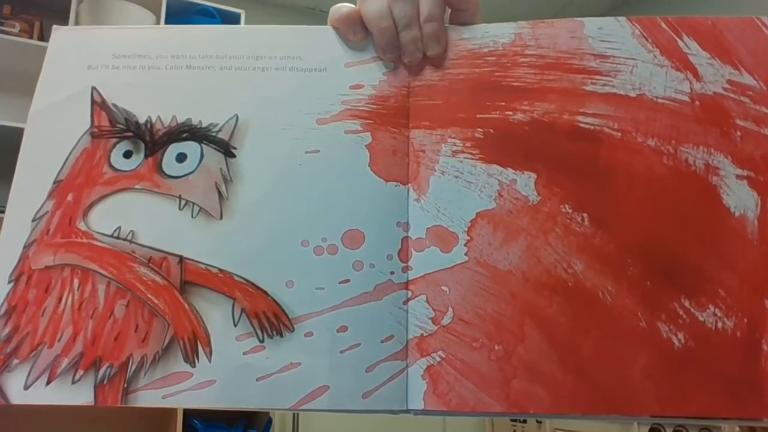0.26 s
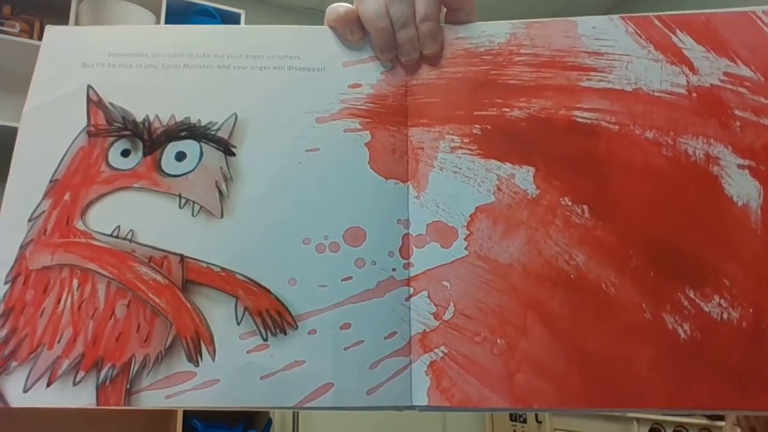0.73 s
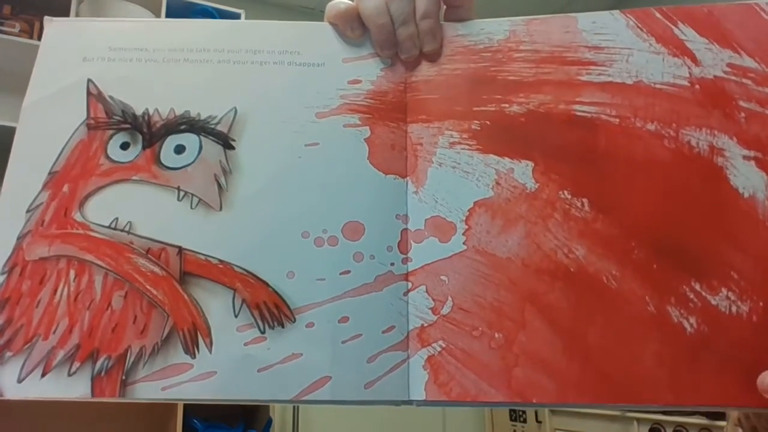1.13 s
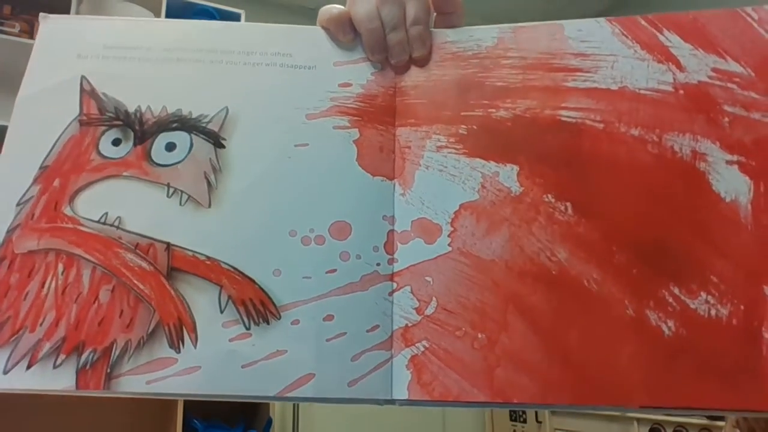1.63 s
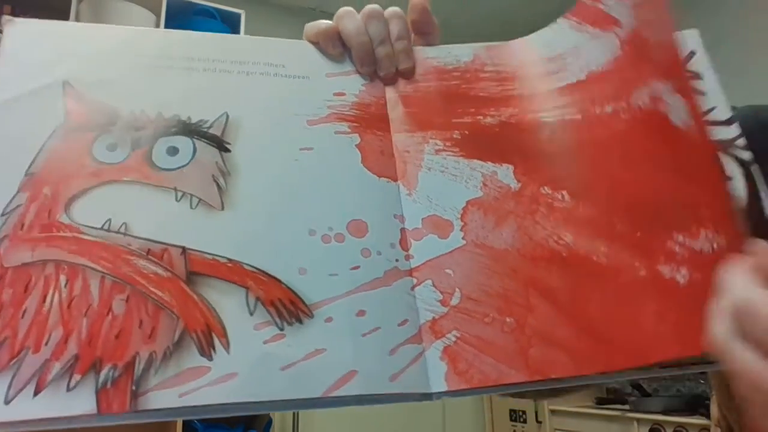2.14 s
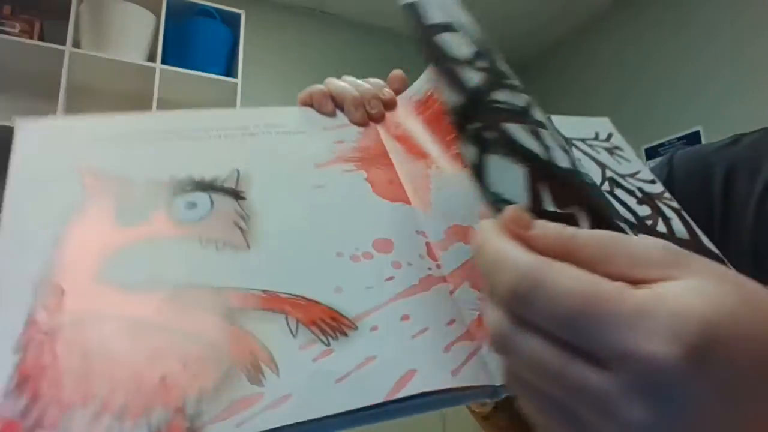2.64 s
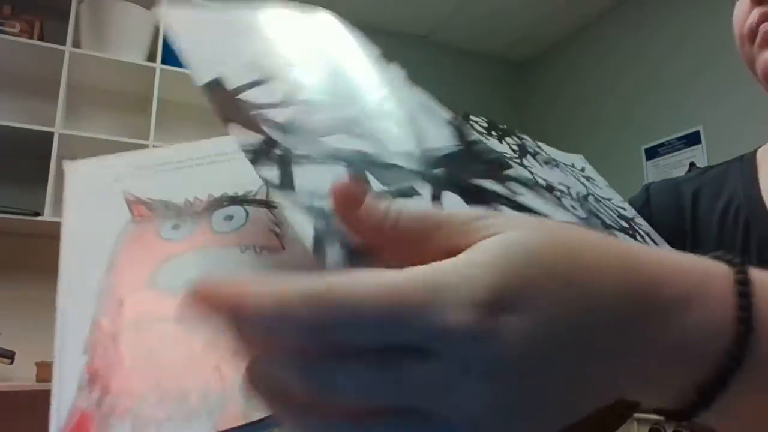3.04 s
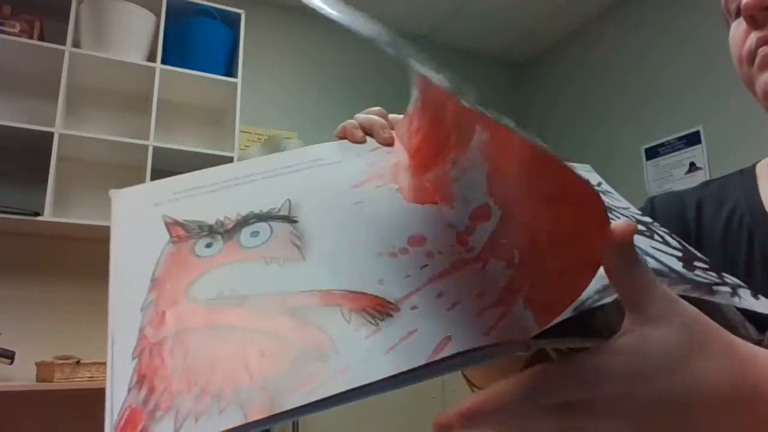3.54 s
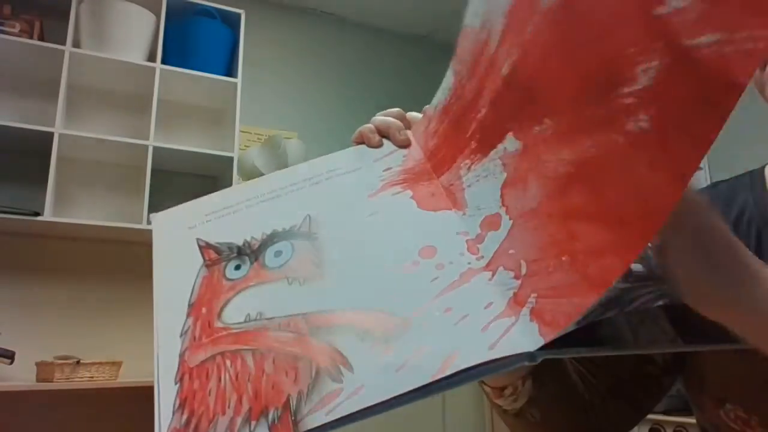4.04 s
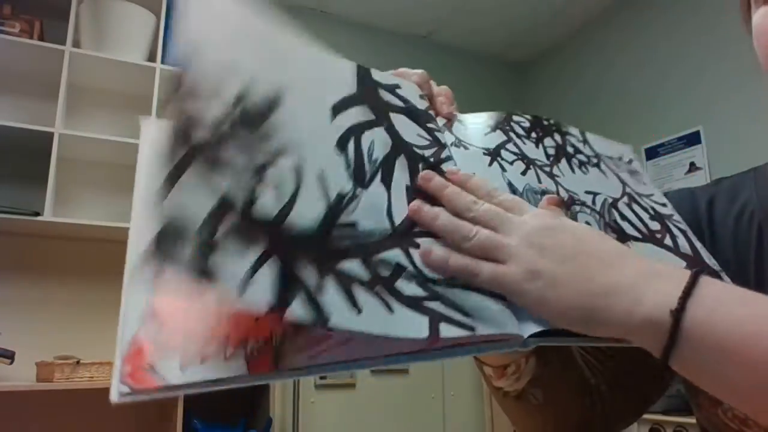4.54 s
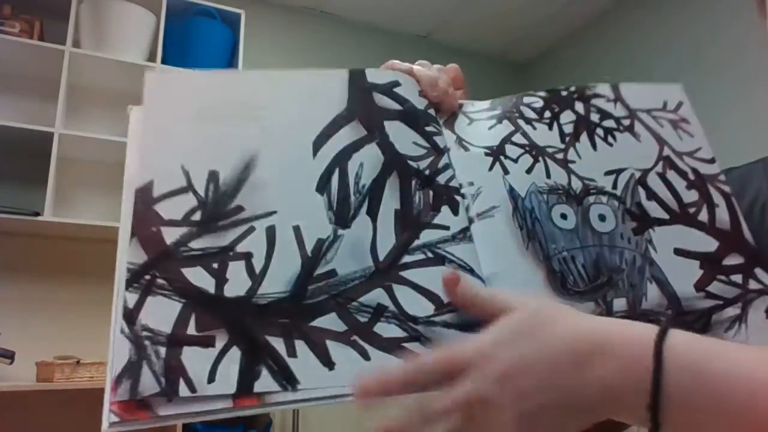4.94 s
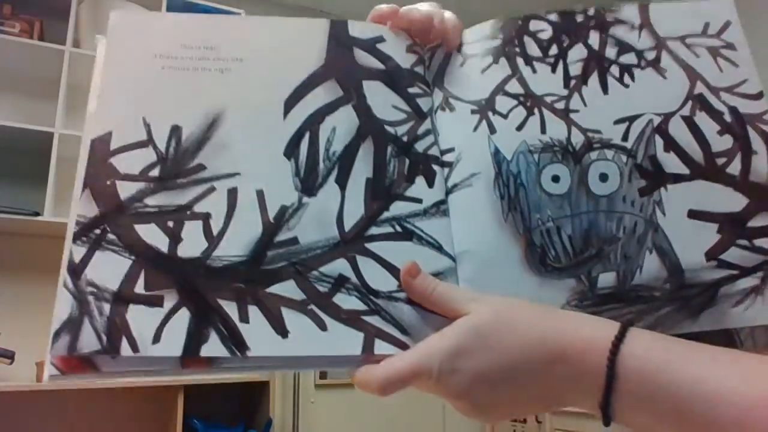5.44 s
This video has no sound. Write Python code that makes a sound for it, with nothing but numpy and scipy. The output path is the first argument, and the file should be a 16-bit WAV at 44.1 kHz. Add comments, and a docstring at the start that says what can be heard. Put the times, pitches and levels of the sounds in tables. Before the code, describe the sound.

In a quiet room, a stiff glossy book page is lifted and turned with crisp crackles, finger scrapes and small hollow flaps.

```python
"""In a quiet room, a hand lifts and turns the stiff glossy page of a large book near a small microphone.
Buckling snaps and short finger slips are brief noise bursts in three ranges of the sheet; hollow flaps boom.
Sliding hisses, bending murmurs and skin rubs as flickering coloured noise, and the room answers the paper.
Beneath lie ventilation rumble, microphone hiss (both coloured noise) and the faint sine whine of electronics."""
import sys
import numpy as np
from scipy import signal
from scipy.fft import rfft, irfft
from scipy.io import wavfile
from scipy.ndimage import uniform_filter1d, map_coordinates

SR = 44100
rng = np.random.default_rng(int(sys.argv[2]) if len(sys.argv) > 2 else 0)


def unload_audio(sound):
    """Save the sound as a 16-bit wav file, at the path given as the first command line argument."""
    columns = np.transpose(np.atleast_2d(sound))
    # keep every value between -1 and 1, then stretch to whole-number steps
    steps = np.round(np.clip(columns, -1, 1) * 32767)
    wavfile.write(sys.argv[1], SR, steps.astype(np.int16))


def amplitude_ratio(level_db):
    """Convert a level in decibels to the matching linear amplitude (field) ratio."""
    exponent = np.asarray(level_db, float) / 20
    return 10 ** exponent


N = 251105  # samples

# Colour of the ventilation rumble: f/Hz, relative level/dB
RUMBLE_COLOUR = [(15, -55), (40, -31.5), (55, -18.5), (72, -2), (90, -5), (115, 2.5), (160, -2), (210, -8),
                 (270, -20), (400, -25), (750, -42.5), (1200, -37)]
# Colour of the microphone hiss: f/Hz, relative level/dB
HISS_COLOUR = [(700, -11.5), (1300, -24.5), (1950, -24), (2600, -23), (2900, -11), (3250, -26.5),
               (4900, -18.5), (7000, -16), (9000, -12.5), (10800, -12.5), (13500, -13.5), (15700, -18)]
# Steady tones of the electronics: f/Hz, rms level/dB
WHINE_TONES = [(2904.5, -93), (5809, -98), (8000, -79), (8683.5, -90), (10191, -93), (10221, -94),
               (10784.5, -91), (10844.5, -92), (10874.5, -92), (10904.5, -79), (11588, -84), (13095.5, -90)]
# Decay of the room: f/Hz, time to fall by 60 dB/s
ROOM_DECAY = [(300, 0.31), (2000, 0.13), (10000, 0.093)]

# Colour of sheet sliding on sheet: f/Hz, relative level/dB
SLIDE_COLOUR = [(1200, -29.5), (2100, -16.5), (2900, -4.5), (3400, -4), (4400, 0), (5300, 0.5), (6500, -5),
                (9000, -14.5), (14000, -27)]
# Colour of the thin top of the slide: f/Hz, relative level/dB
THIN_COLOUR = [(4000, -38.5), (6500, -6), (8500, -2.5), (10500, 0), (13000, 0), (15700, -5)]
# Colour of the bending murmur: f/Hz, relative level/dB
BEND_COLOUR = [(150, -30), (280, -6), (420, -3), (540, -3.5), (680, -7), (850, -15), (1400, -27.5)]
# Colour of skin rubbing paper: f/Hz, relative level/dB
RUB_COLOUR = [(600, -28.5), (950, 0.5), (1200, -3), (1550, -0.5), (2000, -11), (2800, -17)]
# Long slide of the page: t/s, hiss level/dB, thin top over the hiss/dB
SLIDING = [(1.5, -85, 8), (1.68, -72, 8), (1.79, -69, 7), (1.92, -57, -2), (2.18, -69, 3.5),
           (2.27, -61, -3), (2.42, -75, 6), (2.7, -71, 3), (2.83, -67, -1), (3.26, -66.5, 1), (3.4, -71, 7),
           (3.77, -81, 4.5), (4.118, -80.5, 7), (4.132, -63, -4), (4.2, -58.5, 2), (4.41, -60, 6.5),
           (4.5, -64, 5), (4.66, -52, -0.5), (4.77, -51, 7), (4.84, -47.5, 6), (4.98, -53, 8.5),
           (5.06, -63, 4), (5.42, -62, -2.5), (5.69, -59, -4.5)]
# Short separate strokes of sheet on sheet: start t/s, length/s, hiss level/dB, thin top over the hiss/dB
STROKES = [(.698, 0.062, -75.5, 8.5), (0.948, 0.077, -81.5, 11.5), (1.585, 0.032, -72, 1),
           (1.792, 0.097, -55.5, 2), (2.68, 0.033, -70, -3), (2.84, 0.079, -55, -18),
           (2.868, 0.027, -45.5, -17), (3.681, 0.046, -73, -7), (5.47, 0.04, -66.5, -2)]
# Slow bend of the sheet: t/s, murmur level/dB
BENDING = [(1.55, -90.5), (1.75, -74), (1.92, -67.5), (2.1, -67), (2.32, -73.5), (2.5, -80.5), (2.86, -70),
           (3.04, -72.5), (3.2, -85), (4.1, -85.5), (4.22, -65), (4.55, -74), (4.68, -62), (4.75, -71.5),
           (5.11, -76), (5.35, -62.5), (5.45, -63), (5.5, -56.5), (5.6, -62), (5.69, -60)]
# The sheet gives way and settles: t/s, murmur level/dB, settling/(dB per s)
YIELDS = [(.7, -83, 150), (1.595, -73.5, 190), (2.69, -74, 150), (3.31, -67.5, 85), (3.71, -65.5, 85),
          (4.15, -47, 193), (5.19, -72, 110)]

# Hollow flaps of the bending sheet: loudest t/s, boom f/Hz, boom level/dB, upper ring level/dB, boom fall/ms
FLAPS = [(1.592, 490, -59, -52, 6.6), (1.82, 636, -57.5, -66, 8.4), (1.911, 530, -45, -46, 3.8),
         (2.009, 393, -57.5, -56, 8.5), (2.095, 587, -61, -65, 21), (2.293, 495, -57, -69, 3.3),
         (2.418, 496, -63, -68, 5.1), (2.668, 628, -49, -62, 5.9), (2.803, 507, -53, -71, 3.1),
         (2.839, 677, -52, -55.5, 14), (2.915, 760, -50, -55, 16), (3.298, 440, -62.5, -62, 10),
         (3.711, 553, -52, -57, 18), (3.763, 460, -56, -67, 18), (3.791, 600, -59, -72, 22),
         (4.125, 527, -50.5, -56, 9.4), (4.149, 484, -46.5, -65, 20.6), (4.172, 507, -43, -47, 20),
         (4.18, 167, -54.5, -70, 74), (4.551, 550, -61, -54, 7.8), (4.804, 470, -52.5, -81, 4.7),
         (5.374, 506, -40.5, -37, 3.9), (5.459, 586, -55, -55, 8), (5.548, 490, -44.5, -42, 2.6),
         (5.57, 194, -67, -66, 58)]
# Colour of the upper ring of a flap: f/Hz, relative level/dB
RING_COLOUR = [(600, -28), (820, -13), (980, 2.5), (1150, 5), (1350, -19), (1800, -21), (2500, -54)]
# Finger slips: loudest t/s, middle level/dB, bright level/dB, middle rise/ms, middle fall/ms
SLIPS = [(1.82, -34.5, -36, 3.9, 10.2), (1.86, -45, -47, 34, 15), (2.007, -41, -42, 7.2, 6.5),
         (2.68, -58.5, -62, 4.5, 27), (2.918, -37, -64, 6.2, 9), (3.305, -59.5, -60, 12, 9.8),
         (3.691, -57, -60, 23.5, 10.4), (3.815, -63.5, -64.5, 28, 9.4), (4.265, -54, -51, 32, 17),
         (4.646, -41.5, -43, 3.5, 5.4), (4.684, -23, -32.5, 6.2, 2.3), (4.9, -44.5, -47, 10.5, 26),
         (4.989, -47, -44, 4.4, 3.2), (5.11, -44, -44.5, 10, 4), (5.463, -52, -59, 4.2, 4.3),
         (5.534, -45.5, -44.5, 5, 12)]
# Short rubs of a fingertip: loudest t/s, level/dB, rise and fall each/ms
FINGER_RUBS = [(.722, -73, 20), (.957, -69.5, 9.1), (1.87, -53.5, 33), (3.051, -62, 24), (3.7, -66, 22),
               (4.19, -50, 14), (5.199, -62.5, 21), (5.27, -62.5, 23), (5.404, -56, 8), (5.462, -51.5, 5.2),
               (5.49, -59, 11), (5.56, -63, 15), (5.637, -60.5, 30), (5.67, -55, 17)]
# Buckling snaps: loudest t/s, middle level/dB, dull level/dB, bright level/dB, middle fall/ms
SNAPS = [(0.6956, -50, -55, -42, 0.6), (0.7199, -59, -67, -54, 0.72), (0.7459, -68, -58.5, -71, 2.5),
         (1.3108, -61.5, -71, -45.5, 2), (1.5886, -41, -49, -39.5, 3.6), (1.7378, -57, -56.5, -56, 0.52),
         (1.79, -53, -53.5, -54, 3.1), (1.9103, -29, -28, -37, 0.31), (1.9305, -45, -45.5, -43, 3.5),
         (1.9351, -46, -41, -50, 1.7), (2.2075, -54, -80, -53, 1.5), (2.2399, -49, -60, -42.5, 1.1),
         (2.2915, -35, -48.5, -33.5, 1.96), (2.2938, -39, -56, -34.5, 1.7), (2.4144, -62, -55.5, -59, 1.5),
         (2.5124, -57, -77, -49, 1.2), (2.5185, -48, -70, -43, 0.67), (2.5281, -47.5, -66, -34, 0.23),
         (2.5949, -59, -81, -45.5, .6), (2.6674, -29, -40.5, -31, 1.3), (2.7903, -58, -73, -45.5, 1.3),
         (2.801, -41.5, -53.5, -59, 2.2), (2.841, -47.5, -65, -64, 3.6), (2.9752, -46, -56, -66, 1.8),
         (2.9845, -52, -62, -63, 1.4), (3.0681, -52, -62, -75, .9), (3.1073, -55, -64, -44, 2.4),
         (3.197, -49, -74, -45.5, 1.4), (3.2111, -56, -64, -46, .7), (3.265, -42.5, -58, -33.5, 1.4),
         (3.2925, -40.5, -52.5, -41, 2.4), (3.3799, -56, -77, -53, .9), (3.4304, -54.5, -67, -47, 0.5),
         (3.518, -63.5, -77, -68, 4.5), (3.6649, -64, -70, -58, 1.9), (4.1243, -41.5, -54, -41.5, 2.5),
         (4.167, -44, -40.5, -37, 0.22), (4.2808, -42, -63, -40.5, 1.2), (4.3052, -43, -71, -52, .6),
         (4.3806, -37.5, -48, -33.5, 1.9), (4.3962, -49, -73, -32, 3.2), (4.4165, -36, -46, -27, 1.65),
         (4.4282, -36.5, -50, -36, .65), (4.4478, -48, -61, -47, 2.4), (4.5717, -63, -50, -63, .3),
         (4.6346, -43, -44, -49, 3.7), (4.6565, -39, -48, -44, 3.6), (4.672, -41, -30.5, -24.5, 0.71),
         (4.8031, -30, -35, -19.5, 1.6), (4.899, -40, -56, -44, .7), (5.0477, -53, -58, -35.5, .4),
         (5.2136, -54, -65, -50, .35), (5.2576, -40, -45, -51, 0.36), (5.3053, -39, -49, -44, 1.6),
         (5.3268, -42, -49, -60, 0.38), (5.3724, -32, -38.5, -34, 1.06), (5.55, -35, -52, -38, 0.62)]
# Middle range of a crease: f/Hz, relative level/dB
CRACK_COLOUR = [(1200, -47), (2050, -14.5), (2500, -7), (2900, 0.5), (3350, -6), (4200, 2), (5200, -0.5),
                (6500, -5), (9000, -12), (14000, -25)]
# Dull range of a crease: f/Hz, relative level/dB
KNOCK_COLOUR = [(600, -24.5), (950, -8.5), (1200, -6), (1520, 0.5), (1900, -8), (2300, -6.5), (3000, -24.5)]
# Bright range of a crease: f/Hz, relative level/dB
TICK_COLOUR = [(4000, -36.5), (6500, -4), (8500, -1.5), (11000, -1), (13500, -1), (15700, -2.5)]


def unit(x):
    """Scaled to rms 1."""
    return x / np.sqrt(np.mean(x ** 2) + 1e-20)


def along(points, hz):
    """Reads (Hz, value) points at hz, on a log frequency axis."""
    f, value = np.transpose(points)
    return np.interp(np.log(hz + 1), np.log(f + 1), value)


def level_db(rows, t, column=1):
    """One column of a curve at the times t."""
    columns = np.transpose(rows)
    return np.interp(t, columns[0], columns[column])


def kernel(colour):
    """Causal minimum-phase filter of unit power gain, folded from the cepstrum of a colour."""
    size = 8192
    gain = unit(amplitude_ratio(along(colour, np.fft.rfftfreq(size, 1 / SR))))
    cepstrum = irfft(np.log(gain + 1e-6))
    cepstrum[1:size // 2] *= 2
    cepstrum[size // 2 + 1:] = 0
    return irfft(np.exp(rfft(cepstrum)))


def coloured(x, colour):
    """x through the filter of a colour."""
    return signal.fftconvolve(x, kernel(colour))[:len(x)]


def wobble(rate):
    """A smooth random curve of rms 1, with rate knots a second (up to 500)."""
    knots = rng.standard_normal(int(N * 500 / SR) + 4)
    return unit(map_coordinates(knots, [np.arange(N) * rate / SR]))


def patchy(x, patch_db):
    """The curve of the sheet keeps changing which frequencies it radiates."""
    z = signal.stft(x, nperseg=256)[2]
    field = uniform_filter1d(rng.standard_normal(z.shape), size=3, axis=0)  # blurred over frequency
    field = uniform_filter1d(field, size=9, axis=1)  # and over time
    return unit(signal.istft(z * amplitude_ratio(patch_db * unit(field)), nperseg=256)[1][:N])


def grainy(grain_db, rate, patch_db):
    """White noise whose loudness flickers as paper fibres catch and let go."""
    flicker = amplitude_ratio(grain_db * wobble(rate))
    return patchy(flicker * rng.standard_normal(N), patch_db)


def bursts(times, levels_db, rises_ms, falls_ms, kernels):
    """Coloured noise bursts with a rounded top, each with its own rise, fall and filter."""
    out = np.zeros(N + SR)
    noise = grainy(grain_db=1.0, rate=410.0, patch_db=5.0)
    lead = SR // 14  # samples ahead of the loudest moment
    ms = np.arange(-lead, 2 * lead) * 1000 / SR
    for s, db, rise, fall, colour in zip(times, levels_db, rises_ms, falls_ms, kernels):
        at = round(s * SR) - lead
        distance = np.where(ms < 0, -ms / max(rise, 0.03), ms / max(fall, 0.1))
        shape = np.exp(-distance ** 1.6)
        raw = shape * np.resize(noise[at:], len(ms))
        burst = signal.fftconvolve(raw, colour[:1500])[:len(ms)]
        # the filtered burst carries the energy of its envelope
        out[at:at + len(ms)] += amplitude_ratio(db) * burst * np.linalg.norm(shape) / np.linalg.norm(burst)
    return out[:N]


def background():
    """Ventilation rumble and microphone hiss as gently swaying noise, plus thin steady tones."""
    rumble = coloured(rng.standard_normal(N), RUMBLE_COLOUR + [(3000, -94)])
    rumble = amplitude_ratio(-60 + 0.28 * wobble(2.8)) * rumble
    hiss = coloured(rng.standard_normal(N), [(300, -54)] + HISS_COLOUR)
    hiss = amplitude_ratio(-79 + 0.28 * wobble(0.89)) * hiss
    t = np.arange(N) / SR
    whine = np.zeros(N)
    for hz, db in WHINE_TONES:
        peak = np.sqrt(2) * amplitude_ratio(db + 0.5 * wobble(6.9))
        whine += peak * np.sin(2 * np.pi * hz * t + 0.18 * wobble(25.0))
    return rumble + hiss + whine


def room(x):
    """Each frequency of the room's answer dies at its own speed."""
    hz, t, z = signal.stft(rng.standard_normal(SR // 3), SR, nperseg=256)
    fade = amplitude_ratio(-60 * t / along(ROOM_DECAY, hz)[:, None])
    tail = signal.istft(z * fade, SR, nperseg=256)[1]
    delayed = np.pad(x, (130, 0))  # the answer starts 130 samples late
    return signal.fftconvolve(delayed, tail / np.linalg.norm(tail))[:N]


def sliding_db(t):
    """Hiss and thin top at the times t: the long slide plus the short strokes."""
    rise_s, fall_s = 0.006, 0.011
    start, length, db, over_db = np.transpose(STROKES)[:, :, None]
    outside = np.maximum((start - t) / rise_s, (t - start - length) / fall_s)
    on = 1 / (1 + np.exp(np.clip(outside * 2, -50, 50)))  # soft switch
    slide_db = level_db(SLIDING, t)
    top_db = slide_db + level_db(SLIDING, t, column=2)
    hiss = amplitude_ratio(slide_db) + np.sum(on * amplitude_ratio(db), axis=0)
    top = amplitude_ratio(top_db) + np.sum(on * amplitude_ratio(db + over_db), axis=0)
    return 20 * np.log10(hiss), 20 * np.log10(top)


def bending_db(t):
    """Murmur level at the times t: the slow bend plus each sudden yield."""
    rise_s = 0.012
    s, db, db_per_s = np.transpose(YIELDS)[:, :, None]
    settling = amplitude_ratio(db - db_per_s * np.maximum(t - s, 0))
    onset = np.exp(-(np.maximum(s - t, 0) / rise_s) ** 2)
    murmur = amplitude_ratio(level_db(BENDING, t)) + np.sum(settling * onset, axis=0)
    return 20 * np.log10(murmur)


def motion():
    """Sheet slides on sheet, bends with a hollow murmur and rubs the skin, all slightly grainy."""
    t = np.arange(N) / SR
    slide_db, thin_db = sliding_db(t)
    bend_db = bending_db(t)
    # the skin rubs as the sheet both slides and bends
    slide_share = 0.66
    rub_db = -6.5 + slide_share * slide_db + (1 - slide_share) * bend_db
    grip = amplitude_ratio(1.5 * wobble(30.0))  # uneven pressure, shared by all layers
    hiss = coloured(amplitude_ratio(slide_db) * grainy(grain_db=2.0, rate=290.0, patch_db=1.6), SLIDE_COLOUR)
    top = coloured(amplitude_ratio(thin_db) * grainy(grain_db=2.0, rate=450.0, patch_db=-1.5), THIN_COLOUR)
    body = coloured(amplitude_ratio(bend_db) * grainy(grain_db=3.5, rate=53.0, patch_db=3.1), BEND_COLOUR)
    skin = coloured(amplitude_ratio(rub_db) * grainy(grain_db=4.0, rate=120.0, patch_db=3.5), RUB_COLOUR)
    return grip * (hiss + top + body + skin)


def flaps():
    """The air pocket between the pages booms when the sheet jerks; its pitch follows the gap."""
    s, boom_hz, boom_db, ring_db, fall = np.transpose(FLAPS)
    rise = 2.2 * (fall / 10) ** 1.76  # ms; longer flaps swell more slowly still
    t = np.arange(1500) / SR
    # each pocket dies in a few cycles
    pockets = [t * np.exp(-1.1 * hz * t) * np.sin(2 * np.pi * hz * t) for hz in boom_hz]
    boom = bursts(s, boom_db, rise, fall, pockets)
    ring = bursts(s, ring_db, rise, 0.75 * fall, [kernel(RING_COLOUR)] * len(s))
    return boom + ring


def creases(s, mid_db, dull_db, bright_db, rise, fall):
    """Each snap or slip shakes the sheet in a middle, a dull and a bright range."""
    middle = bursts(s, mid_db, rise, fall, [kernel(CRACK_COLOUR)] * len(s))
    dull = bursts(s, dull_db, rise, 1.08 * fall, [kernel(KNOCK_COLOUR)] * len(s))
    bright = bursts(s, bright_db, 1.15 * rise, 0.93 * fall, [kernel(TICK_COLOUR)] * len(s))
    return middle + dull + bright


def slips():
    """Fingers slip on the gloss in short scrapes, or rub it dully."""
    s, mid_db, bright_db, rise, fall = np.transpose(SLIPS)
    scrapes = creases(s, mid_db, mid_db - 12, bright_db, rise, fall)
    at, rub_db, length = np.transpose(FINGER_RUBS)
    return scrapes + bursts(at, rub_db, length, length, [kernel(RUB_COLOUR)] * len(at))


def snaps(count=70):
    """The sheet buckles in the listed snaps, and in small ones at random that grow with the sliding."""
    s = rng.uniform(1.6, 5.6, count)
    scatter_db = rng.uniform(-1, 1, (3, count))
    mid_db, dull_db, bright_db = sliding_db(s)[0] + 4.5 + scatter_db  # set over the hiss of the moment
    small = np.transpose([s, mid_db, dull_db - 9, bright_db - 1, np.full(count, 0.67)])
    s, mid_db, dull_db, bright_db, fall = np.vstack([SNAPS, small]).T
    rise = 0.26 + 0.16 * fall  # ms
    return creases(s, mid_db, dull_db, bright_db, rise, fall)


def scene():
    """One microphone, copied to both channels."""
    paper = snaps() + slips() + flaps() + motion()
    answer = amplitude_ratio(-14.5) * room(paper)
    return np.tile(paper + answer + background(), (2, 1))


def roll_off(x):
    """The treble ends steeply here."""
    return signal.sosfilt(signal.butter(12, 16950, fs=SR, output="sos"), x)


def record(dry):
    """The recorder keeps little deep bass and little above its band limit."""
    bass_hz, top_hz = 40, 15760
    hz = np.fft.rfftfreq(N, 1 / SR)
    band_limit = np.where(hz < top_hz, 1, amplitude_ratio(-40))
    bass_cut = 1 / np.sqrt(1 + (bass_hz / (hz + 1)) ** 4)
    mix = irfft(rfft(dry) * band_limit * bass_cut, N)
    return roll_off(mix)


dry = scene()
out = record(dry)
unload_audio(out)
```